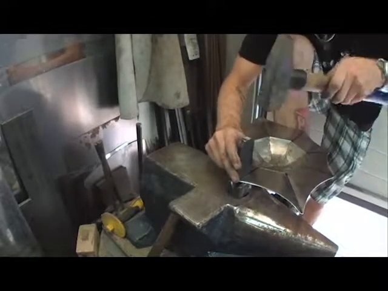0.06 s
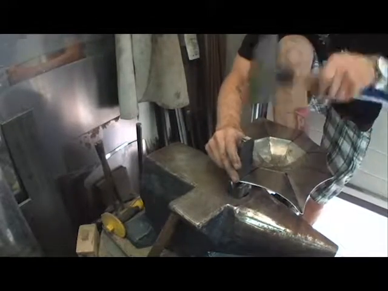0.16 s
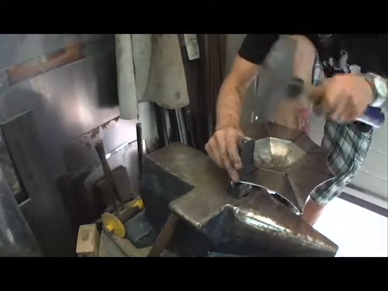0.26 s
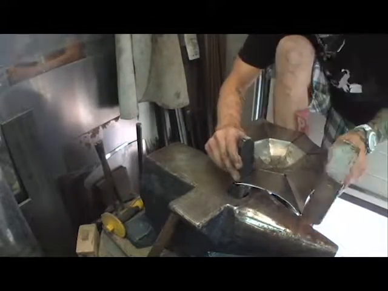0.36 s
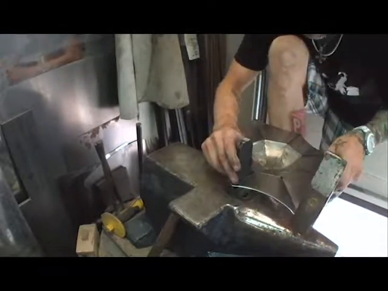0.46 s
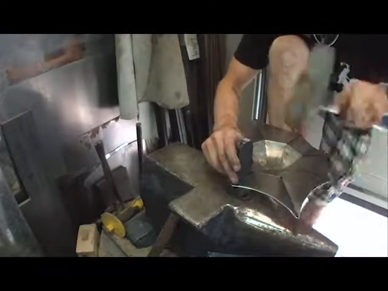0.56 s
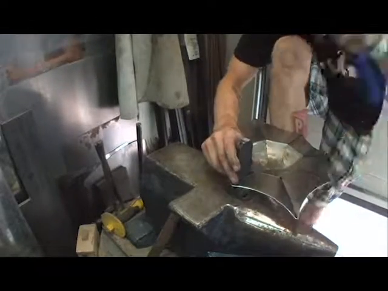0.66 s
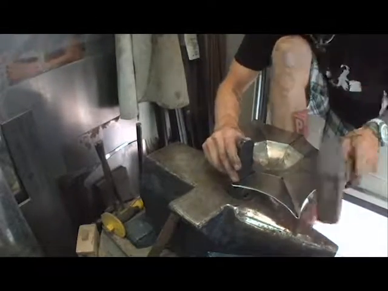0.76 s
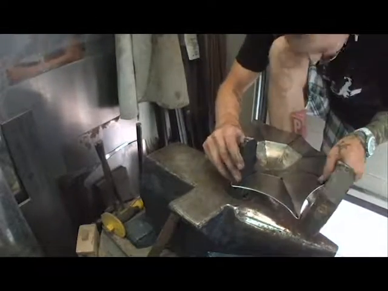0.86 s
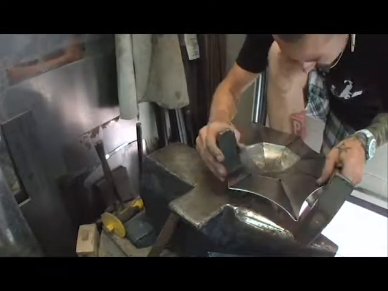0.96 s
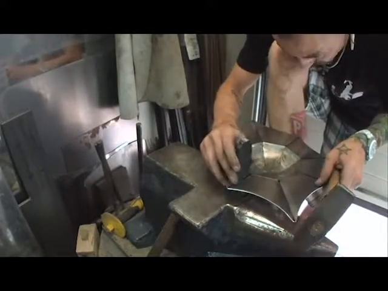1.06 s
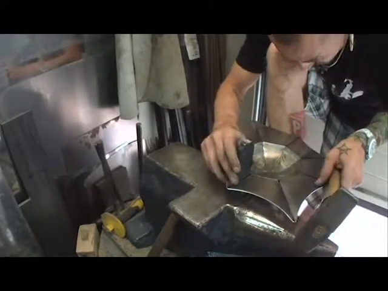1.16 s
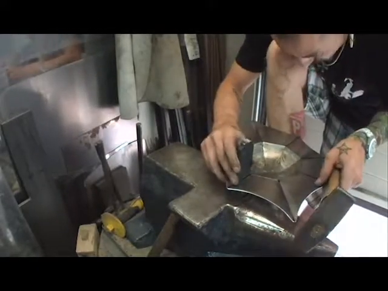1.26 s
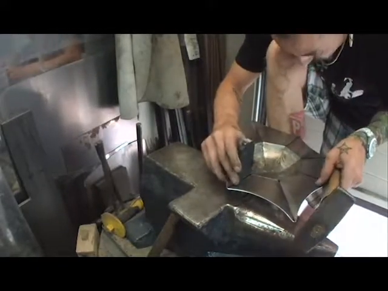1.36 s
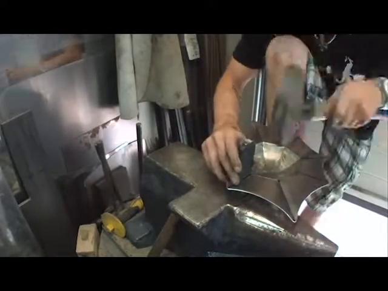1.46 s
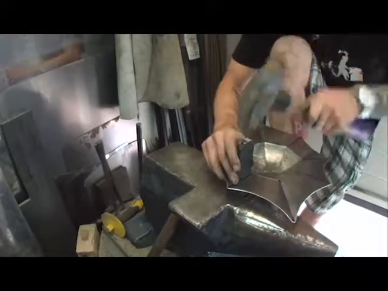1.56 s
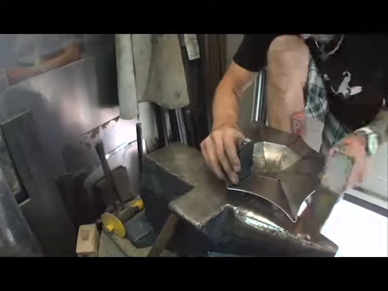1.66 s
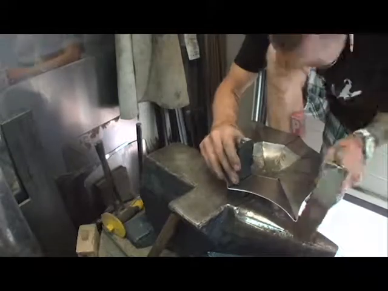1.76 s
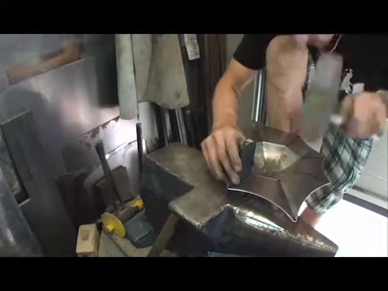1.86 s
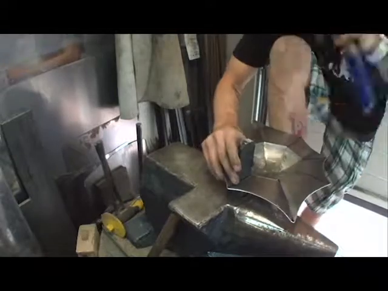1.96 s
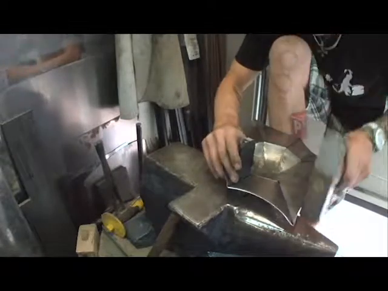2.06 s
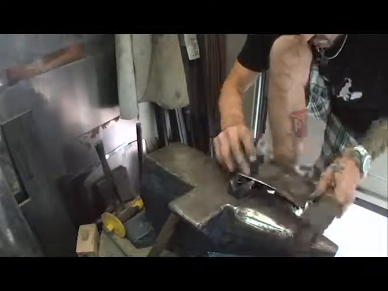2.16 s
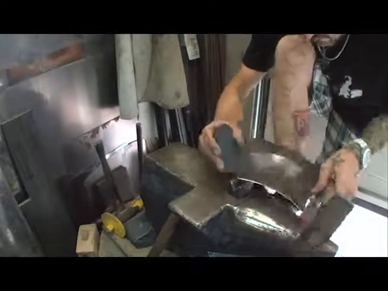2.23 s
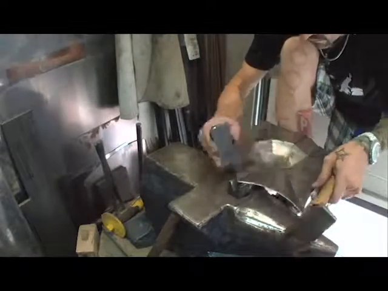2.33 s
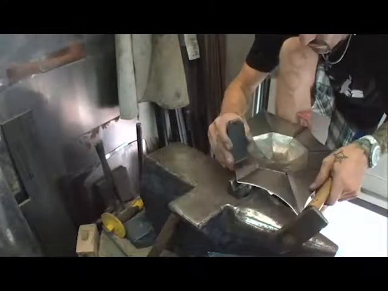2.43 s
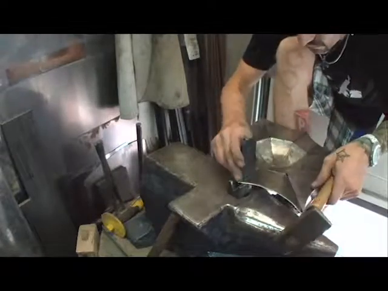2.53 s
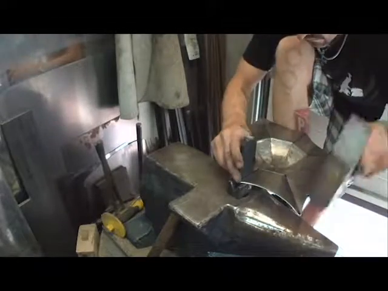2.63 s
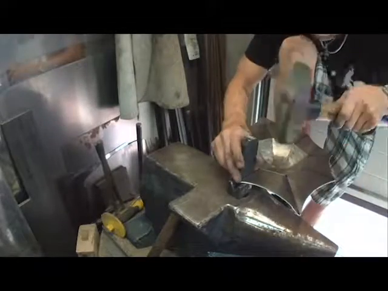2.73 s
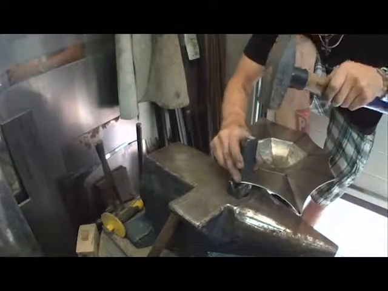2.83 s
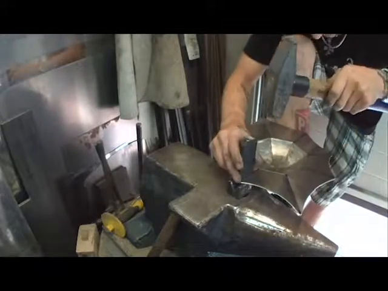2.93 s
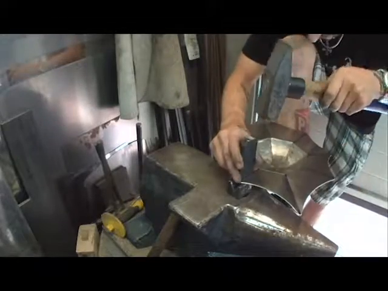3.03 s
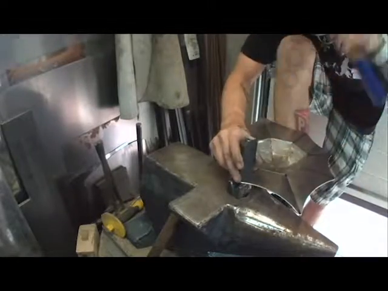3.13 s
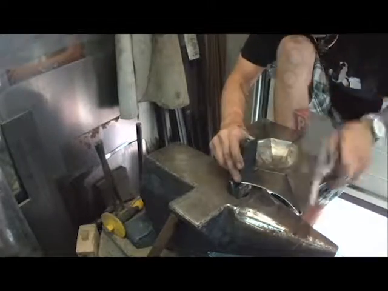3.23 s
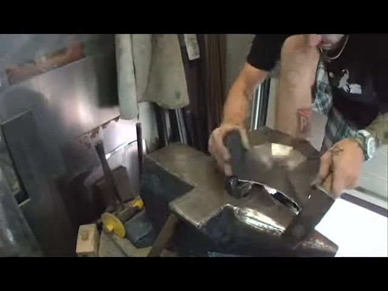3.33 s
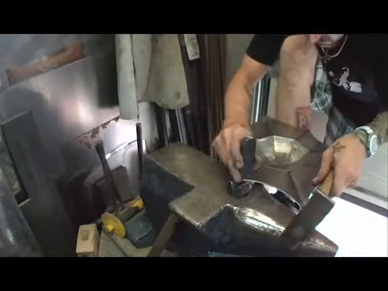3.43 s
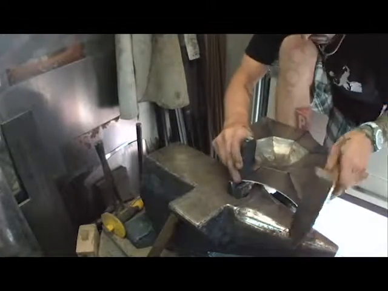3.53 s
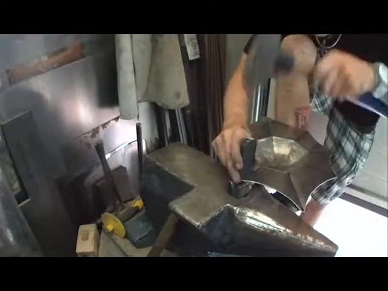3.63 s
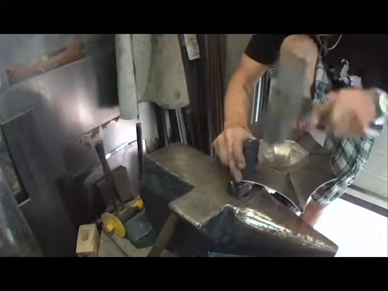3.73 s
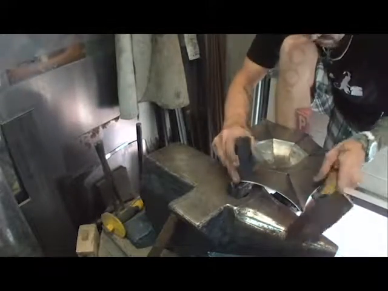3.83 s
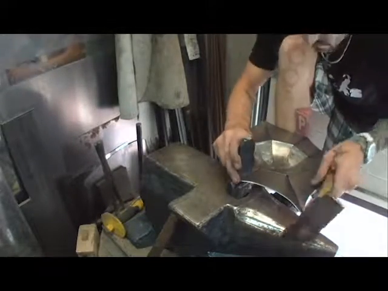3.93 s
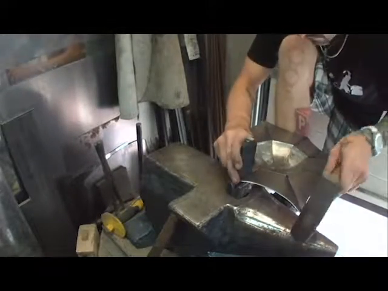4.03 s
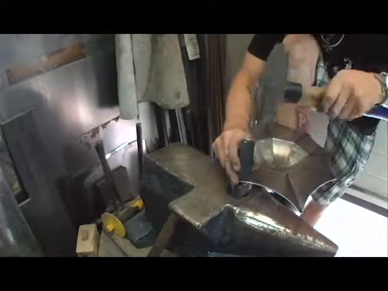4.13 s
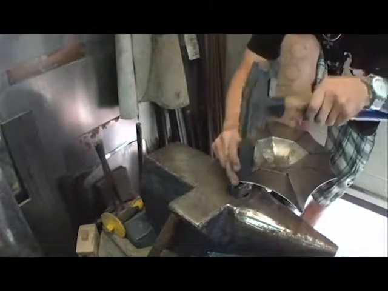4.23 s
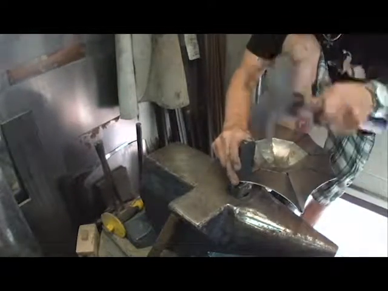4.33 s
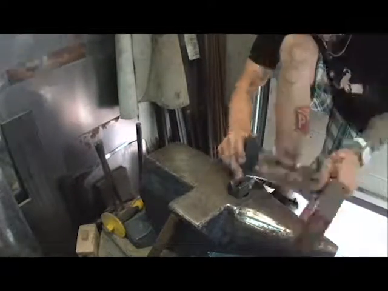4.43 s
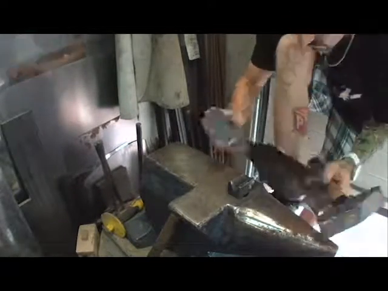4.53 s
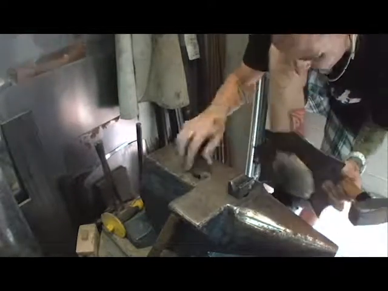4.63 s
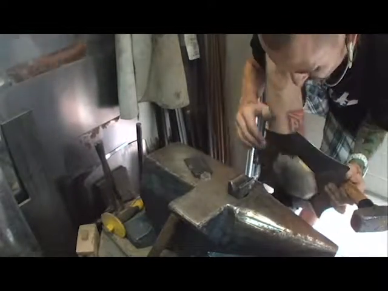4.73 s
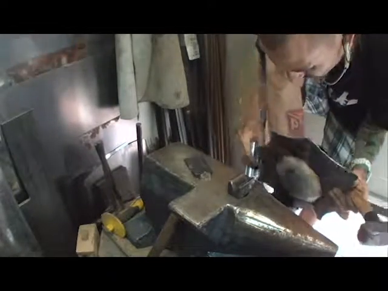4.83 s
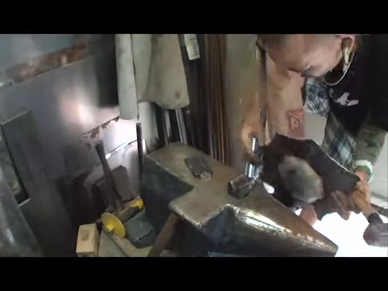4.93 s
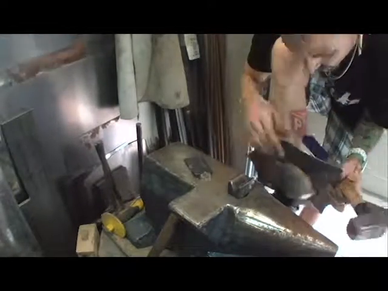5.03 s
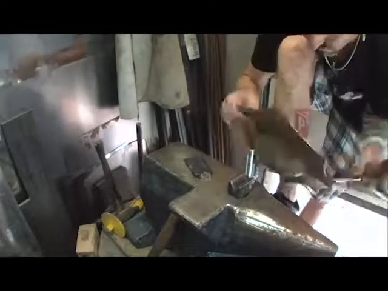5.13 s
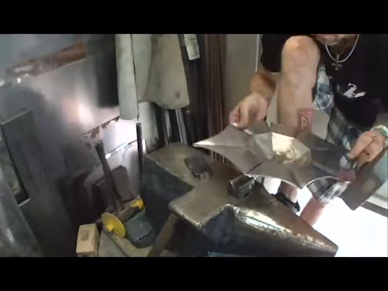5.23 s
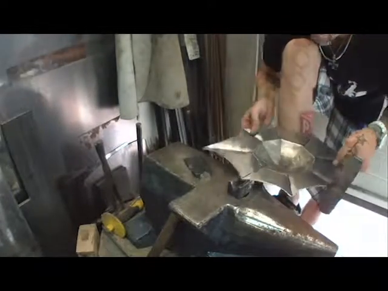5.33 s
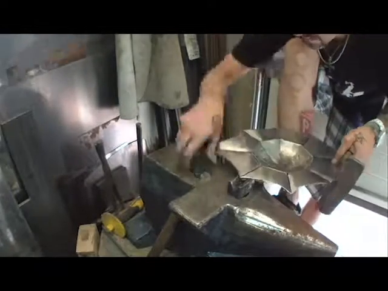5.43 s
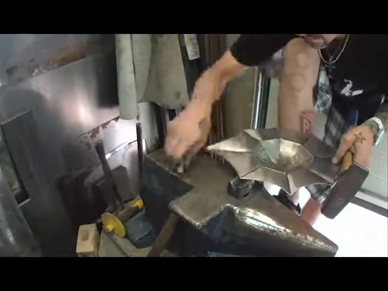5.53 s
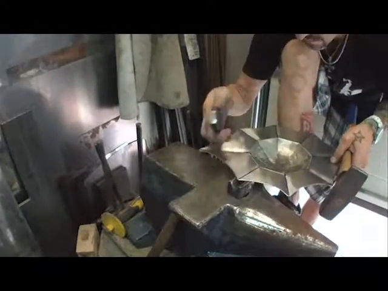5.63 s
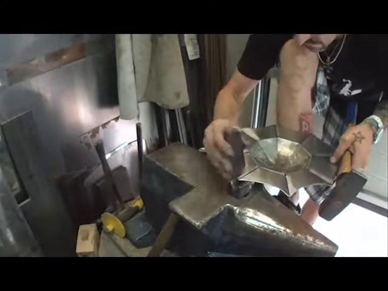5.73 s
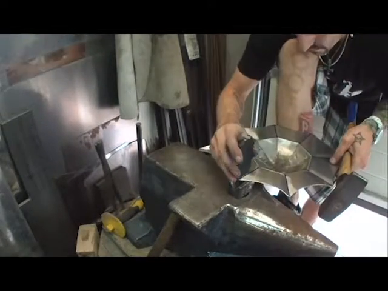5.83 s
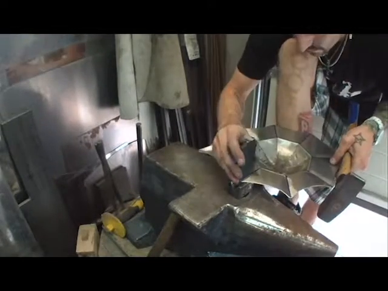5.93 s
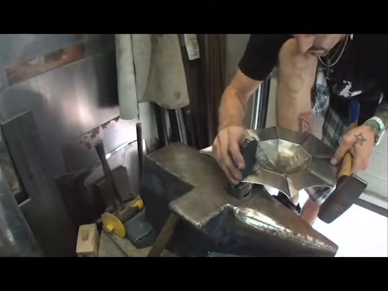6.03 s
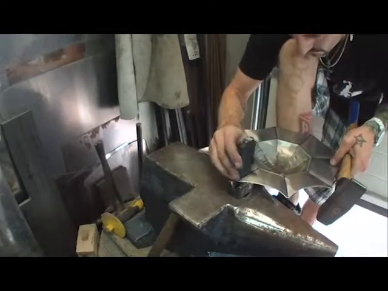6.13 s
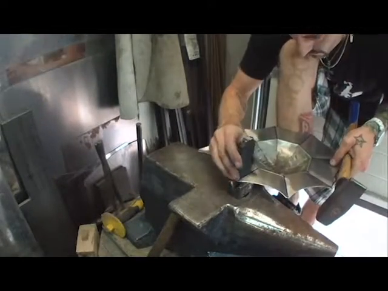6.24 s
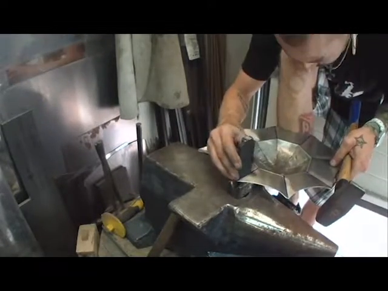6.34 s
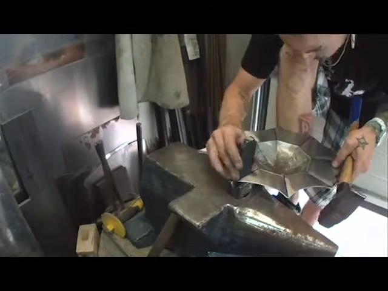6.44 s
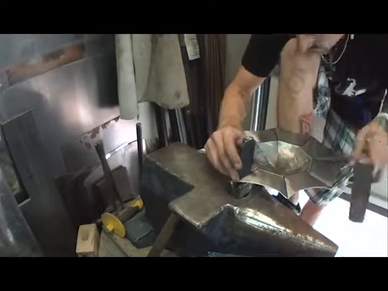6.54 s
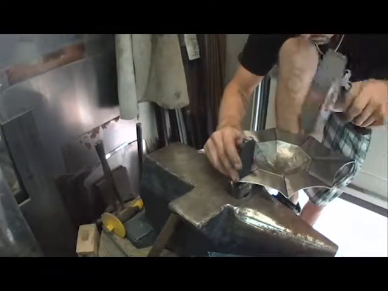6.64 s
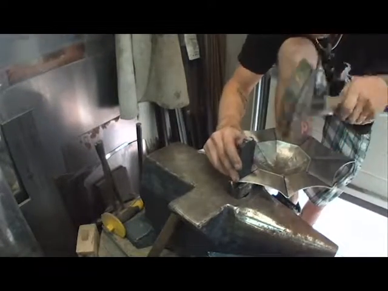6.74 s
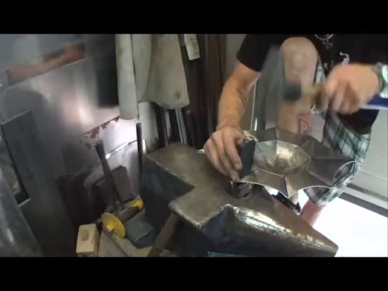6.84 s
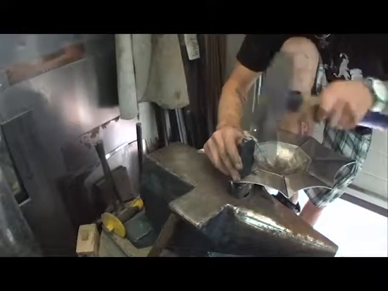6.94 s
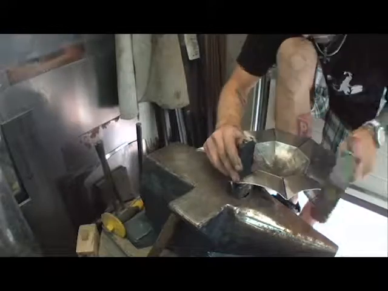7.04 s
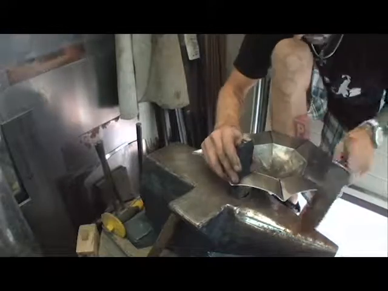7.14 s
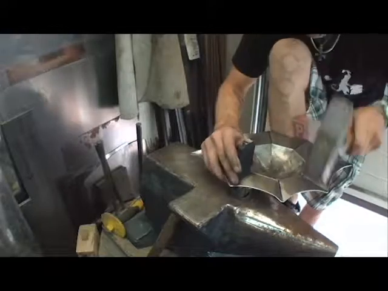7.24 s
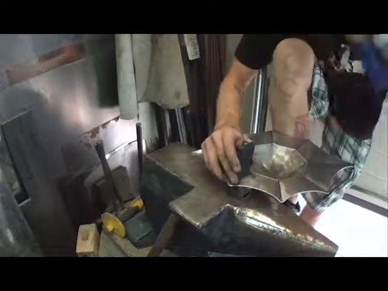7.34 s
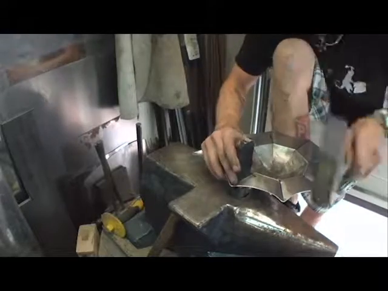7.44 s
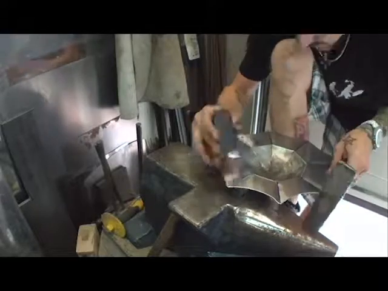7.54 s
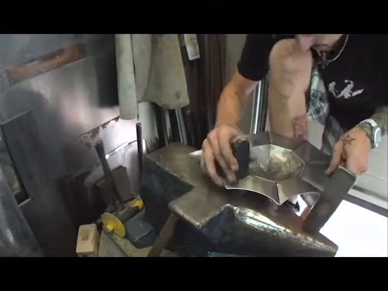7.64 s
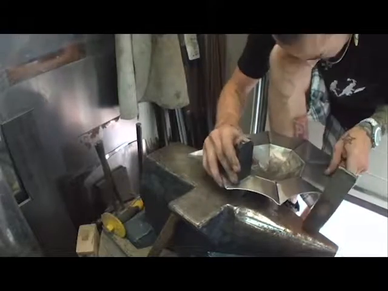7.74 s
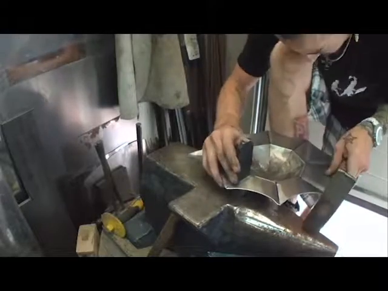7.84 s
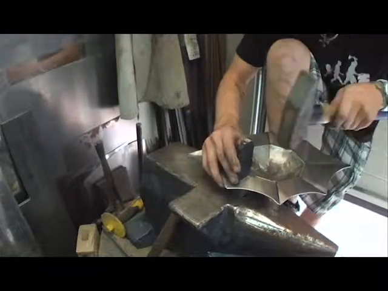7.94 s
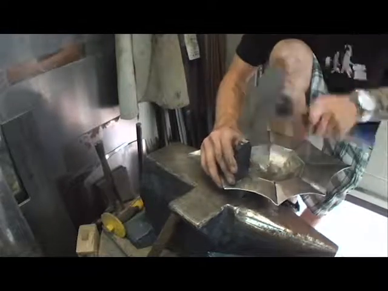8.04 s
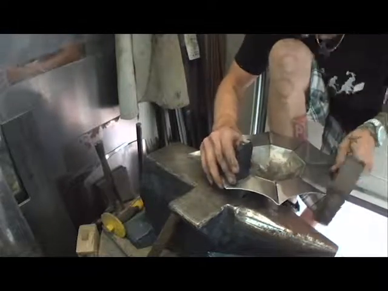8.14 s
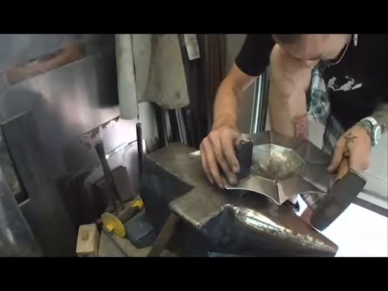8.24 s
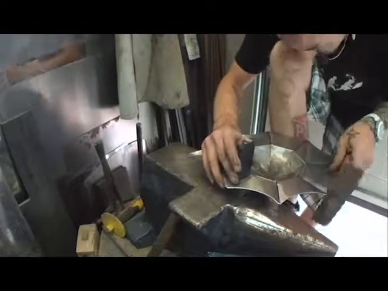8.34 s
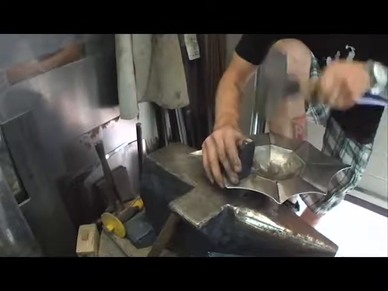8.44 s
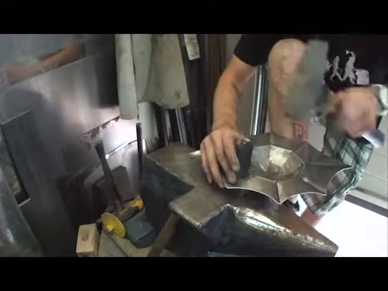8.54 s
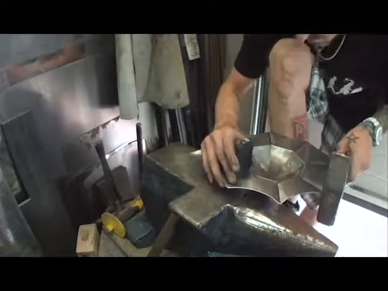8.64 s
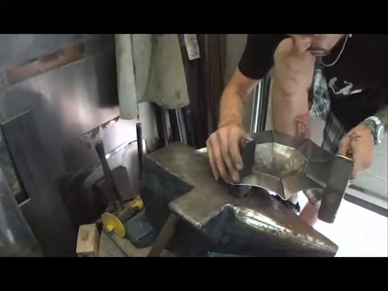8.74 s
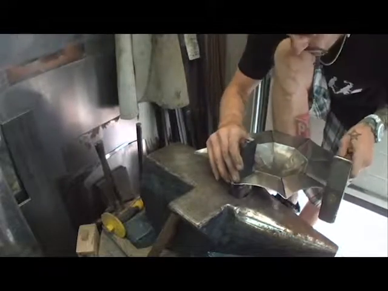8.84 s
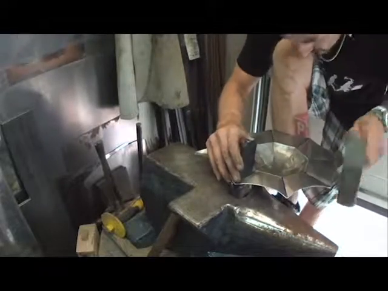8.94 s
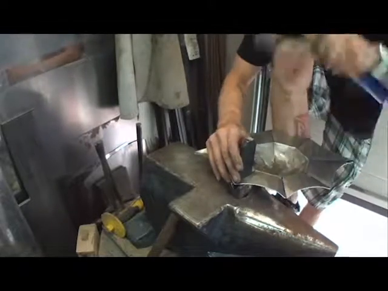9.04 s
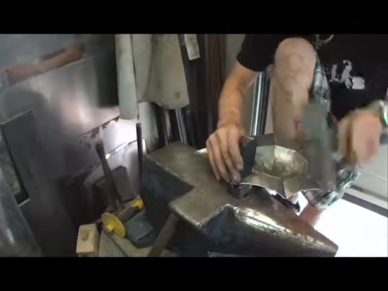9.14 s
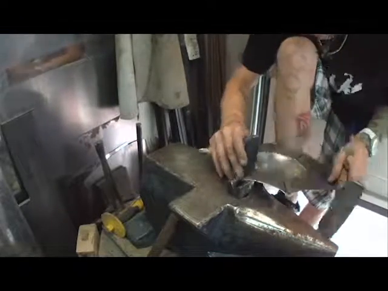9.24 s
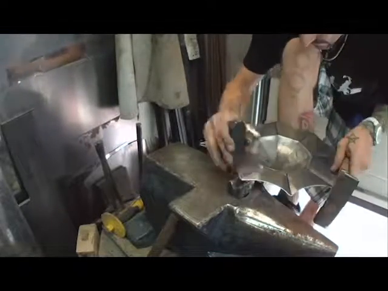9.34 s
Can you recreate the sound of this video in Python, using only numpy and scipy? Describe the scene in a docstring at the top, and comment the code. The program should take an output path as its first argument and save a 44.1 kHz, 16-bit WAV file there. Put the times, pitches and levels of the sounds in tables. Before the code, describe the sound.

In a small workshop, a hammer drives a steel tool into a metal sheet on an anvil. Seven sharp, quickly damped clangs come at uneven intervals, with light clinks between them. The hammering pauses while the sheet rattles and a faint hum rises, then five more blows follow. The anvil rings faintly, and each blow slightly overloads the close microphone.

```python
"""A small workshop: a smith hammers a steel tool into a dished steel sheet on an anvil.
Each heavy blow makes sheet and tools clang and overloads the close microphone. The hand damps
the sheet quickly; the anvil rings on faintly. Between blows, hammer, tool and sheet bounce and
touch with light clinks. Room air and a faint hum lie underneath."""
import sys
import numpy as np
from scipy import signal
from scipy.fft import rfft, irfft, next_fast_len
from scipy.io import wavfile

SR = 44100
rng = np.random.default_rng(int(sys.argv[2]) if len(sys.argv) > 2 else 0)


def master(y):
    """Save y as 16-bit WAV."""
    cut = np.clip(np.atleast_2d(y).T, -1, 1)
    pcm = np.round(cut * 32767)  # scale
    wavfile.write(sys.argv[1], SR, pcm.astype(np.int16))


N = 414079
TOP_HZ = 15780
SHEET_TURNED_S = 5.5


def amp(db):
    return 10 ** (np.asarray(db) / 20)


def unit_rms(x):
    return x / np.sqrt(np.mean(x ** 2) + 1e-20)


def curve(points, hz):
    """Interpolate (frequency [Hz], value) points on a log frequency axis."""
    freqs, values = np.transpose(points)
    return np.interp(np.log(hz + 1), np.log(freqs + 1), values)


def filtered(x, response):
    """Apply the gain response(hz) by FFT."""
    size = next_fast_len(len(x) + SR // 4)
    return irfft(rfft(x, size) * response(np.fft.rfftfreq(size, 1 / SR)), size)[:len(x)]


def noise(colour_db, size):
    """Unit-rms noise with spectrum colour_db(hz)."""
    return unit_rms(filtered(rng.standard_normal(size), lambda hz: amp(colour_db(hz))))


def decay(t, t60_s):
    return np.exp(-np.log(1000) * t / t60_s)


def band_decay(x, t60_points):
    """Fade each frequency at its own rate."""
    hz, t, spectrum = signal.stft(x, SR, nperseg=256)
    return signal.istft(spectrum * decay(t, curve(t60_points, hz)[:, None]), SR, nperseg=256)[1][:len(x)]


def add(track, start_s, x):
    part = track[round(start_s * SR):][:len(x)]
    part += x[:len(part)]


def ring(modes, t, scatter_db, blur):
    """Damped sines with scattered levels; chatter widens each line by blur times its frequency."""
    hz, db, t60_s = np.transpose(modes)[:, :, None]
    gain = amp(db + scatter_db * rng.standard_normal(hz.shape))
    drift = np.cumsum(rng.standard_normal((len(hz), len(t))), 1) * np.sqrt(2 * np.pi * blur * hz / SR)
    phase = 2 * np.pi * (hz * t + rng.random(hz.shape)) + drift
    return np.sum(gain * decay(t, t60_s) * np.sin(phase), 0)


# air spectrum: (frequency [Hz], relative density [dB])
AIR_SPECTRUM = [(10, -32), (28, -17), (50, -19.5), (95, -18), (260, -21.5), (360, -25), (710, -29),
                (1150, -34), (1600, -36), (15800, -51)]


def room_air(level_db=-48.5):
    """Steady workshop air, mostly low rumble."""
    return amp(level_db) * noise(lambda hz: curve(AIR_SPECTRUM, hz), N)


# hum swells: (start [s], end [s], relative level [dB])
HUM_SWELLS = [(5.439, 6.06, -51.5), (6.104, 6.847, -54.5)]


def machine_hum(pitch_hz=303, waver_hz=2.56, fade_s=0.2, gain_db=4.0):
    """A faint, wavering machine tone that swells twice."""
    t = np.arange(N) / SR
    waver = noise(lambda hz: curve([(4, 4), (12, -25), (40, -120)], hz), N)
    swell = sum(amp(db) * np.clip(np.minimum(t - start_s, end_s - t) / fade_s, 0, 1)
                for start_s, end_s, db in HUM_SWELLS)
    return amp(gain_db) * swell * np.sin(2 * np.pi * np.cumsum(pitch_hz + waver_hz * waver) / SR)


# room decay: (frequency [Hz], t60 [s])
ROOM_T60 = [(200, 0.31), (1000, 1), (3500, 0.75), (9000, 0.4), (15000, 0.3)]


def workshop(x, wet_db, build_s=0.0022):
    """Direct sound plus wall reflections."""
    t = np.arange(SR // 2) / SR
    tail = band_decay(rng.standard_normal(len(t)), ROOM_T60) * (1 - np.exp(-t / build_s))
    wet = signal.fftconvolve(x, tail / np.linalg.norm(tail))
    return np.pad(x, (0, len(wet) - len(x))) + amp(wet_db) * wet


def weak_modes(t, count=230):
    """Plate modes, about evenly spaced: frequencies and their sine and cosine waves."""
    hz = (np.arange(count) + rng.random(count)) * TOP_HZ / count
    phase = 2 * np.pi * hz[:, None] * t
    return hz, np.vstack([np.sin(phase), np.cos(phase)])


def contact_colour(body_db, treble_db, ripple_db, count=70):
    """Spot and force of a contact tilt the spectrum and favour random mode groups; returns dB(hz)."""
    tilt = [(1200, body_db), (2000, 0), (5000, 0), (8000, treble_db)]
    ripple = ripple_db * rng.standard_normal(count)
    return lambda hz: curve(tilt, hz) + np.interp(hz, np.linspace(0, TOP_HZ, count), ripple)


# envelope of the sheet's weak modes: (frequency [Hz], relative level [dB])
SHEET_SPECTRUM = [(300, -20), (600, -8.5), (1000, 0), (1600, -2), (2500, -1.5), (3600, -0.5), (5200, 0),
                  (6700, -5.5), (8000, 1), (9800, 5.5), (11200, -0.5), (13300, -2), (14300, -0.5),
                  (15300, 1)]


def clash(sheet, contact_db, rattle_db):
    """All weak modes at once plus steel-on-steel rattle; unit rms."""
    mode_hz, waves = sheet
    colour_db = lambda hz: curve(SHEET_SPECTRUM, hz) + contact_db(hz)
    strengths = rng.standard_normal((2, len(mode_hz))) * amp(colour_db(mode_hz))
    rattle = amp(rattle_db) * noise(colour_db, waves.shape[1])
    return unit_rms(unit_rms(strengths.ravel() @ waves) + rattle)


# released modes: (time [s], frequency [Hz], level [dB], t60 [s])
RELEASED_MODES = [(1.573, 2620, -39, 0.42), (1.81, 2690, -45, 0.17), (2.0, 9410, -44, 0.75),
                  (2.383, 2620, -49, .25), (4.315, 3710, -44, 1), (8.047, 9659, -55, 1),
                  (8.512, 9600, -51.5, 0.93)]


def singing_modes():
    """Single modes sing on when the hand lets them go."""
    out, t = np.zeros(N), np.arange(SR) / SR
    for time_s, *mode in RELEASED_MODES:
        add(out, time_s, ring([mode], t, scatter_db=1, blur=0.0002))
    return out


# loose sheet shifting on the anvil: (start [s], end [s], contact rate [1/s], relative level [dB])
SHEET_SHIFTS = [(2.073, 2.557, 12, -40), (3.239, 3.602, 15, -36), (4.394, 4.694, 13, -36),
                (5.268, 5.432, 25, -37)]


def chatter():
    """Faint random contacts while the sheet shifts; rows as in LIGHT_CONTACTS."""
    return [(start_s + (end_s - start_s) * when, db + 4 * (force - 0.5), -22, -15, 2250 + 450 * pitch, 1)
            for start_s, end_s, rate, db in SHEET_SHIFTS
            for when, force, pitch in rng.random((20, 3))[:round((end_s - start_s) * rate)]]


def bounces(contacts, flight_s=0.03, loss_db=13.5, ping_hz=2310):
    """While loose, the sheet bounces once after each given contact."""
    return [(time_s + flight_s, db - loss_db, body_db, treble_db - 0.5, ping_hz, 2)
            for time_s, db, body_db, treble_db, *_ in contacts
            if any(start_s < time_s < end_s for start_s, end_s, *_ in SHEET_SHIFTS)]


# hammer, tool and sheet touching; relative levels:
# (time [s], level [dB], body [dB], treble [dB], ping [Hz], ping level [dB])
LIGHT_CONTACTS = [(1.0325, -20, -25, -10, 2640, -1.5), (1.4095, -38.5, -15, -23, 5320, -3),
                  (1.8083, -28.5, -33, -14, 2696, -18), (2.1007, -9.5, -25, -20, 3430, 0.5),
                  (2.1063, -9.5, -21.5, -17.5, 4210, 1.5), (2.3825, -18.5, -20, -19, 1940, -15),
                  (2.4982, -14, -23.5, -15.5, 2650, -11), (3.271, -20.5, -24, -18.5, 3760, -4),
                  (3.3766, -28.5, -13, -16, 2310, 2), (3.7937, -25.5, -21.5, -21, 2480, -1),
                  (3.8705, -28.5, -2.5, -16, 1450, -7), (3.933, -21, -13.5, -16, 2285, 2),
                  (4.2348, -7, -15.5, -15.5, 2270, -4.5), (4.4283, -22, -20, -15, 4750, -8),
                  (4.438, -13, -5, -12.5, 11600, 2), (4.5181, -26, -26.5, -10.5, 11541, -4),
                  (4.61, -33.5, -35, -2, 9800, -8), (5.238, -34, -14, -15, 5813, -2),
                  (5.2983, -31.5, -15, -18, 9770, 5), (5.3065, -17, -23, -12.5, 5810, -8),
                  (5.8316, -29.5, -8, -12.5, 3628, -7), (6.398, -38.5, -19, -22, 2280, 5),
                  (7.0296, -26.5, -18, -17, 1760, -3.5), (7.621, -20, -30, -16, 3560, -7),
                  (8.1498, -29.5, -17, -26, 3600, 0), (8.3487, -39, -12, -26, 3600, 2),
                  (8.63, -23, -21, -20, 3650, -8), (8.8498, -35, -30, -25, 3420, -5),
                  (9.2683, -29.5, -16.5, -18, 2380, -8)]


def clinks(sheet, t, t60_s=0.057, attack_s=0.00018):
    """Light contacts: a sharp onset, a brief shimmer of the sheet and one ping."""
    out = np.zeros(N)
    # light touch: (frequency [Hz], gain [dB])
    touch = [(400, -16.5), (900, -0.5), (4000, 3), (6700, -7), (9600, 0.5), (11000, -4.5), (15500, -4.5)]
    attack = 1 - np.exp(-t / attack_s)
    envelope = decay(t, t60_s) + amp(-17) * decay(t, t60_s=0.17)
    contacts = list(LIGHT_CONTACTS) + bounces(LIGHT_CONTACTS) + chatter()
    for time_s, db, body_db, treble_db, ping_hz, ping_db in contacts:
        contact_db = contact_colour(body_db + 21, treble_db + 11.5, ripple_db=4.5)
        shimmer = clash(sheet, lambda hz: curve(touch, hz) + contact_db(hz), rattle_db=-15.5) * envelope
        ping = ring([(ping_hz, ping_db, 1.7 * t60_s)], t, scatter_db=1, blur=0.004)
        add(out, time_s, amp(db - 9) * workshop((shimmer + ping) * attack, wet_db=-27.5))
    return out


def modes_at(modes, time_s):
    """Turning the sheet puts a new spot under the tool, changing the mode levels."""
    turned = time_s > SHEET_TURNED_S
    return [(hz, turned_db if turned else db, t60_s) for hz, db, turned_db, t60_s in modes]


# anvil and hammer head; relative levels: (frequency [Hz], level [dB], level after turn [dB], t60 [s])
ANVIL_MODES = [(723, -49, -50, 2.1), (765, -59, -53, 0.65), (2160, -46.5, -47.5, 1.06),
               (2450, -43, -45.5, 0.5), (2470, -50, -70, 0.73), (3740, -52.5, -56.5, 1.24),
               (3680, -54.5, -49, 1), (4330, -63, -47.5, 0.63), (5140, -58, -59, 0.594),
               (8532, -57, -60, 0.45), (10000, -53, -64, 0.7)]


def anvil_ring(time_s):
    """Faint, long ring of anvil and hammer head."""
    return ring(modes_at(ANVIL_MODES, time_s), np.arange(SR) / SR, scatter_db=0, blur=0.0002)


def crack_and_mic_thump(t):
    """A blow's first broadband crack, plus the low thump of the overloaded microphone."""
    crack = noise(lambda hz: curve([(300, -7), (1000, -2.5), (15000, -8)], hz), len(t))
    mic_thump = noise(lambda hz: curve([(30, 4), (120, -11), (500, -18), (1500, -60.5)], hz), len(t))
    return amp(-5.5) * crack * decay(t, t60_s=0.0067) + amp(-24.5) * mic_thump * decay(t, t60_s=0.11)


# damping of the hand-held sheet: (frequency [Hz], t60 [s])
SHEET_T60 = [(600, 0.13), (3000, 0.11), (9000, 0.085), (15000, 0.094)]
# sheet and tools; relative levels: (frequency [Hz], level [dB], level after turn [dB], t60 [s])
STRONG_MODES = [(167.3, -20, -22, 0.22), (301.4, -25.5, -25.5, 0.25), (590, -32.5, -34, 0.41),
                (785, -15.5, -20.5, 0.11), (1027, -11.5, -21, 0.096), (1213, -28, -43, 0.27),
                (1763, -29, -30, 0.3), (2045, -16, -36, 0.064), (2594, -6.5, -7, 0.105),
                (2800, -17, -15.5, 0.12), (3374, -2.5, -1.5, 0.061), (3745, -2, -1.5, 0.049),
                (4290, -62.5, -5, 0.084), (4730, -8, -11, 0.102), (5450, -32, -15.5, 0.16),
                (7560, -18, -9, 0.12), (8630, -1, -0.5, 0.047), (9500, -15, -30, 0.047),
                (9750, -52, 4.5, 0.046), (10470, 3.5, -2, 0.033), (12970, -9, -8, 0.11)]
# blows; relative levels: (time [s], force [dB], body [dB], clang [Hz], clang level [dB], ping [Hz])
HAMMER_BLOWS = [(0.237, -6, 1.5, 1772, -13, 9652), (0.6922, -5.5, -1, 2548, -28, 9360),
                (1.5732, -3.5, -2, 2675, -17.5, 9360), (2.0001, -2.5, -5, 2670, -11.5, 9404),
                (3.166, -6.5, -3, 3832, -16, 10460), (3.693, -8, -2, 3210, -15.5, 9160),
                (4.3146, -8, -3, 3730, -9.5, 9150), (6.9145, -6, 0, 2597, -13.5, 10440),
                (7.385, -3.4, -3, 5205, -18, 8585), (8.047, -3.5, 1, 3500, -16, 8565),
                (8.512, -2.5, 1, 3590, -15, 10100), (9.098, -6, -1.5, 3460, -10, 2586)]


def hammer_blows(sheet, t, spread_s=0.01):
    """Each blow spreads through the sheet and favours two modes; harder blows are brighter."""
    out = np.zeros(N)
    spread = 1 - np.exp(-t / spread_s)
    for time_s, force_db, body_db, clang_hz, clang_db, ping_hz in HAMMER_BLOWS:
        treble_db, ping_db = 2.5 + 0.63 * force_db, -1 + 2 * force_db
        contact_db = contact_colour(body_db, treble_db, ripple_db=2.5)
        weak = band_decay(clash(sheet, contact_db, rattle_db=3), SHEET_T60)
        clang_and_ping = [(clang_hz, clang_db, 0.115), (ping_hz, ping_db, 0.1)]
        favoured = ring(clang_and_ping, t, scatter_db=1.5, blur=0.0033)
        strong = ring(modes_at(STRONG_MODES, time_s), t, scatter_db=1.5, blur=0.0048)
        steel = (amp(5.5) * weak + amp(9.5) * favoured + strong) * spread
        add(out, time_s, amp(force_db) * workshop(crack_and_mic_thump(t) + steel, wet_db=-30))
        add(out, time_s, amp(force_db) * anvil_ring(time_s))
    return out


def scene():
    """Mono mix; blows and clinks share one sheet."""
    t = np.arange(SR // 3) / SR
    sheet = weak_modes(t)
    return (hammer_blows(sheet, t) + singing_modes() + clinks(sheet, t) + room_air() + machine_hum())[None]


def record(dry, ceiling=0.29, hardness=22.0, dc_offset=0.036):
    """Microphone saturation on the blows, then a steep band limit and a DC offset."""
    saturated = dry[0] / (1 + np.abs(dry[0] / ceiling) ** hardness) ** (1 / hardness)
    band_limited = filtered(saturated, lambda hz: 1 / (1 + (hz / TOP_HZ) ** 240))
    return (band_limited + dc_offset)[None]


dry = scene()
out = record(dry)
master(out)
```